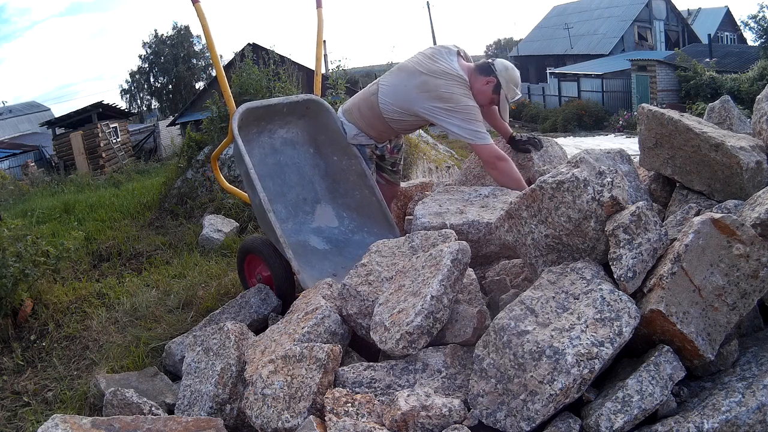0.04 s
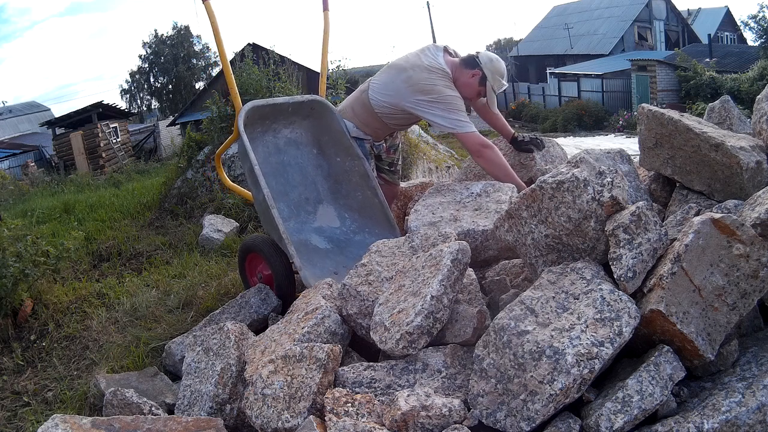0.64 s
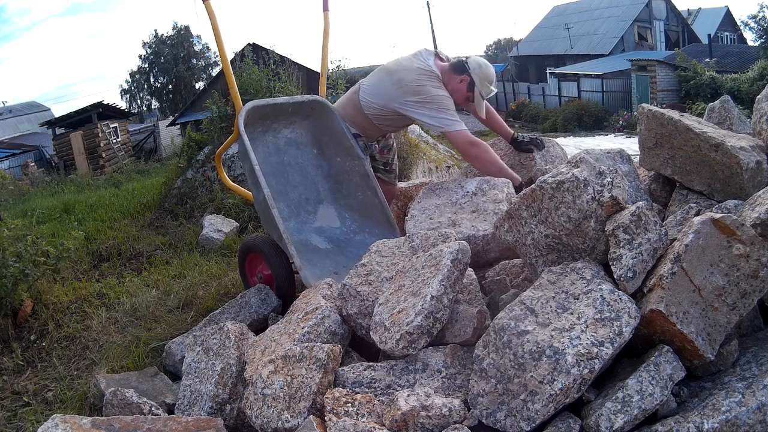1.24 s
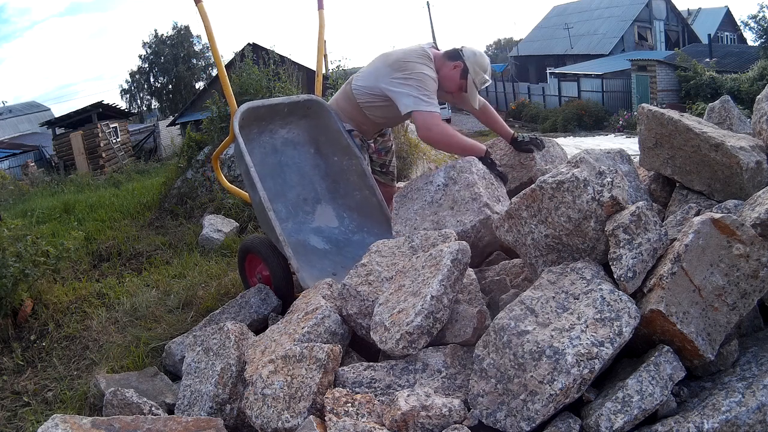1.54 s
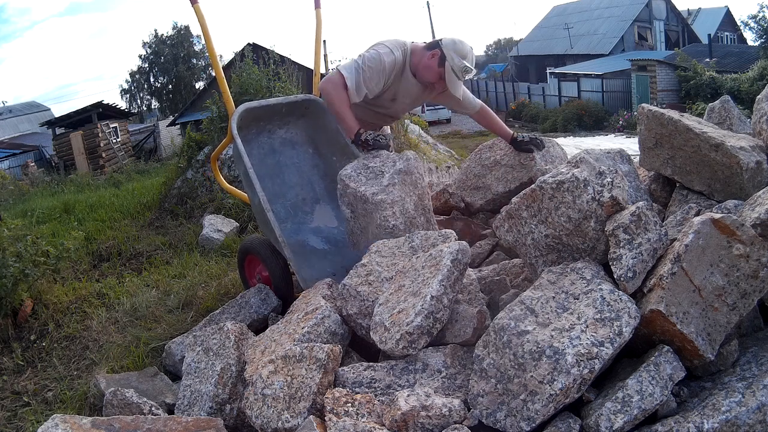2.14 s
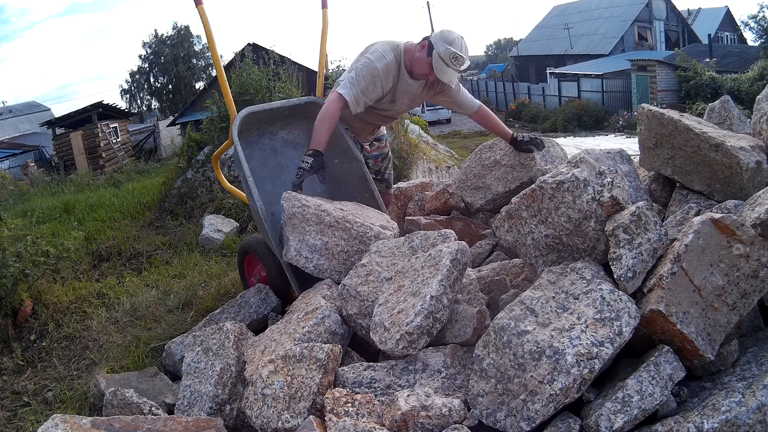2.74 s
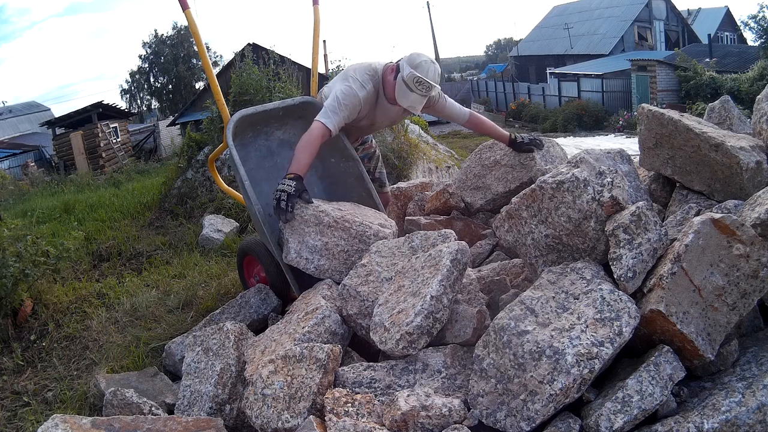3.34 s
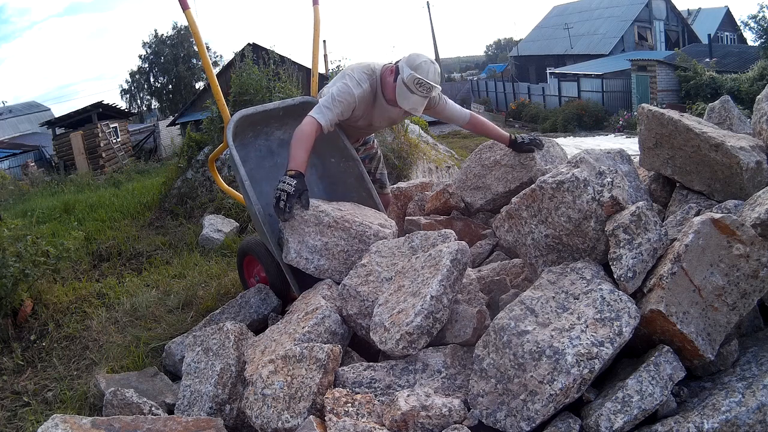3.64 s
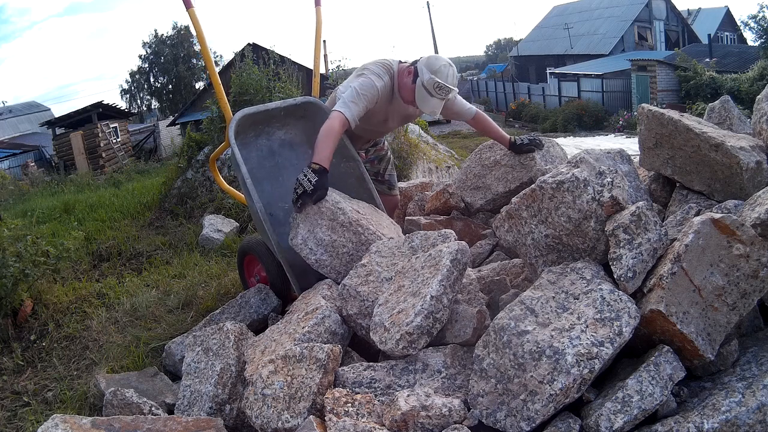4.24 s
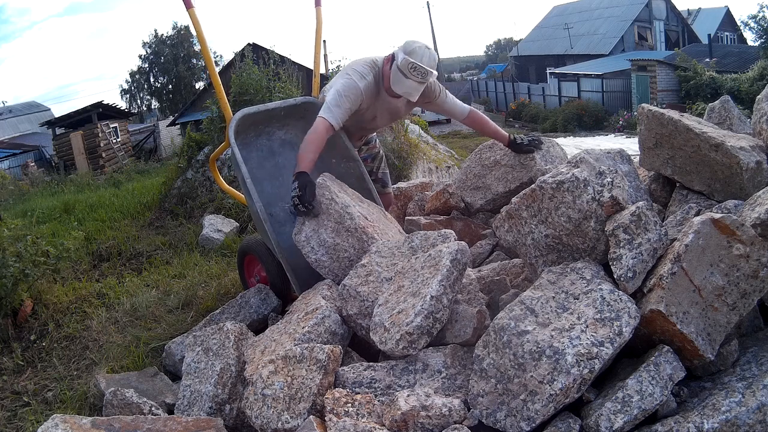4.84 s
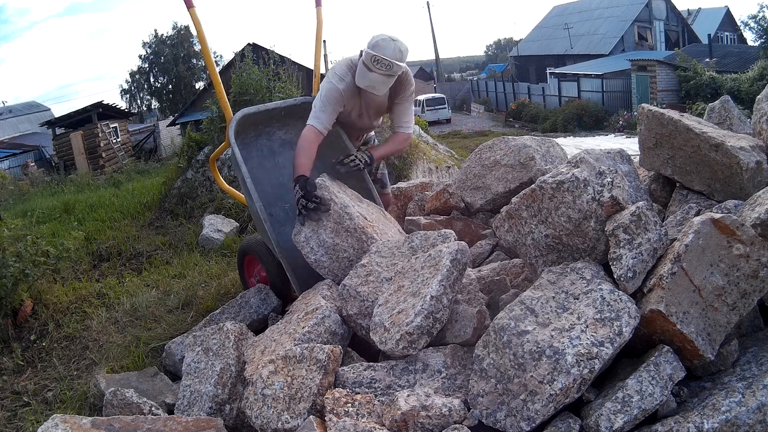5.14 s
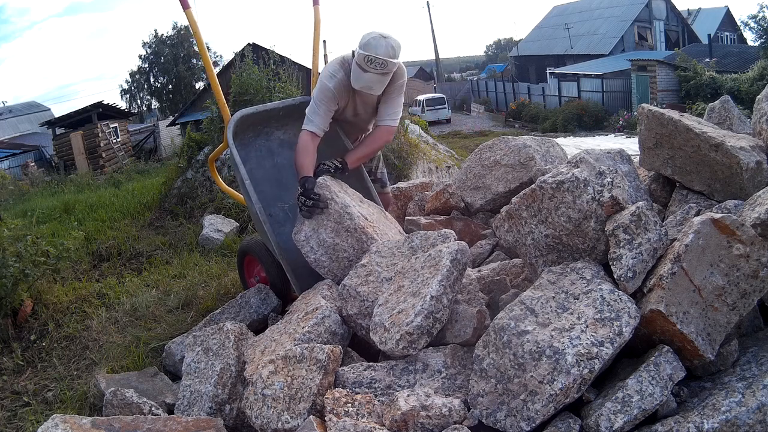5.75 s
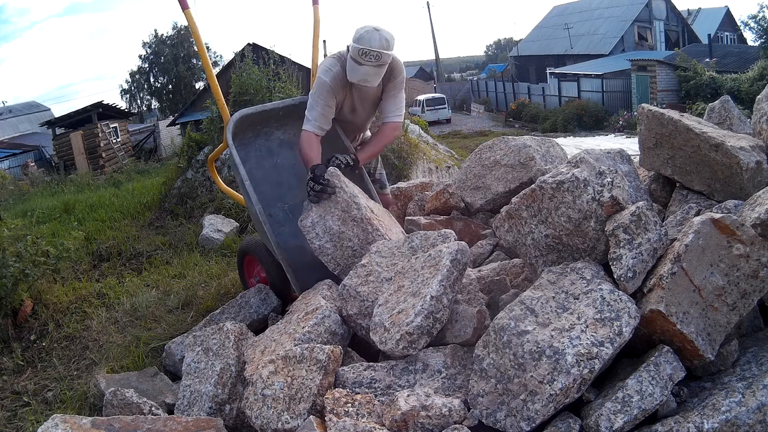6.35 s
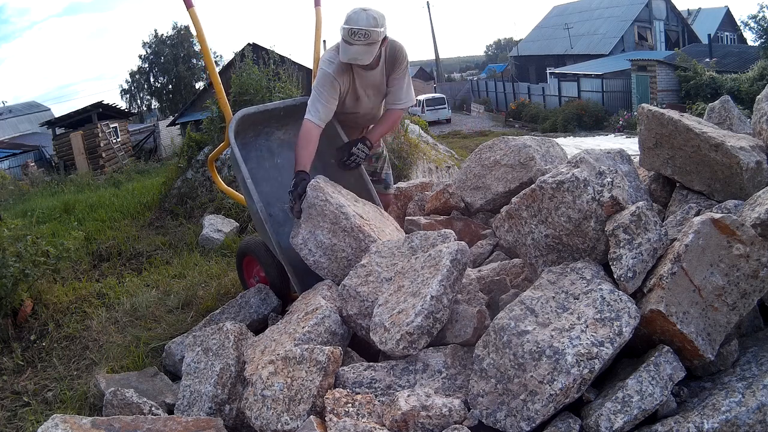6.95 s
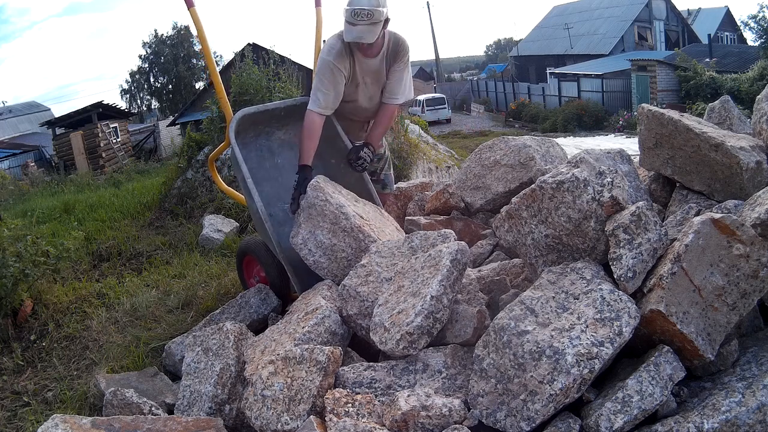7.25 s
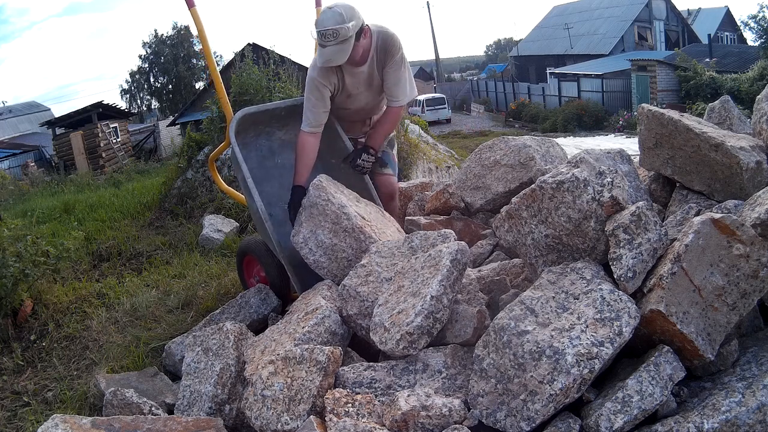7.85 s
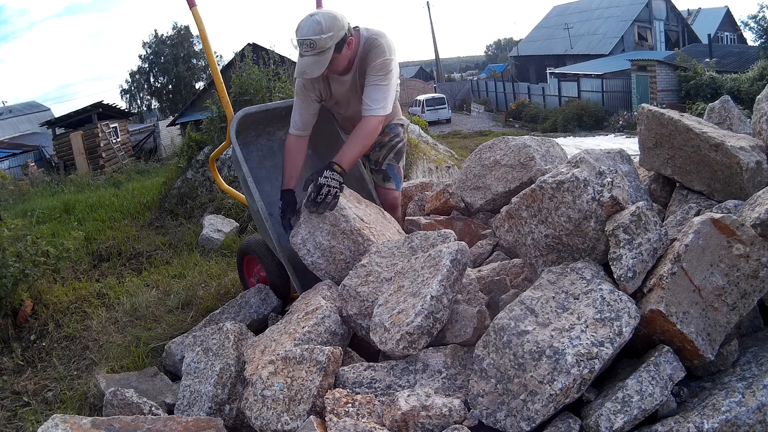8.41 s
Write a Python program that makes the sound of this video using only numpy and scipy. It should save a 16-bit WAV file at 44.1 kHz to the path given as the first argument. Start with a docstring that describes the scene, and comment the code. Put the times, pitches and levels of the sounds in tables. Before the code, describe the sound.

Outdoors, a heavy stone block is dragged off a pile with gritty scrapes, clacks and tiny squeaks. It tumbles into a steel wheelbarrow with two loud blows, and the tray booms briefly under them. Shorter, quieter shoves and dull knocks follow, with pauses, as the block is worked into place. The microphone is a few metres away over faint air, and the heaviest hits overload it slightly.

```python
"""A gritty scrape and a dull knock: a heavy granite block is dragged off a pile, then tumbled into an
upended steel wheelbarrow and shoved into place. Its rough faces stick and slip, knock, squeak and shed
grit, and the steel tray booms under every blow. Outdoors, a few metres away, over faint air: only the
neighbouring stones reflect, and the two heaviest blows overload the microphone."""
import sys
import numpy as np
from scipy import signal
from scipy.fft import rfft, irfft, next_fast_len
from scipy.io import wavfile
from scipy.ndimage import uniform_filter1d

SR = 44100
rng = np.random.default_rng(int(sys.argv[2]) if len(sys.argv) > 2 else 0)


def log_audio(samples):
    """Write samples as a 16-bit WAV file to the path given in sys.argv[1]."""
    # one column per channel
    frames = np.atleast_2d(samples).T
    # limit to full scale, then quantise
    limited = np.clip(frames, -1, 1)
    pcm = np.round(limited * 32767).astype(np.int16)
    wavfile.write(sys.argv[1], SR, pcm)


N = 378378


def undb(db):
    """Decibels to gain."""
    return 10 ** (np.asarray(db) / 20)


def unit(x):
    """Scale to rms 1."""
    return x / np.sqrt(np.mean(x ** 2))


def unit_energy(x):
    """Scale a response so that it passes white noise at the same level."""
    return x / np.sqrt(np.sum(x ** 2))


def add(track, start_s, x):
    """Mix x into the track from start_s on."""
    i = max(int(start_s * SR), 0)
    track[i:i + len(x)] += x[:len(track) - i]


def colour(x, curve, size=4096):
    """Minimum-phase EQ shaped by (freq_hz, gain_db) points, scaled to unit energy."""
    hz, db = np.transpose(curve)
    bin_hz = np.maximum(np.arange(size // 2 + 1) * SR / size, 1)
    gain = undb(np.interp(np.log(bin_hz), np.log(hz), db))
    cepstrum = irfft(np.log(gain))
    cepstrum[1:size // 2] *= 2  # folding the cepstrum makes the filter causal
    cepstrum[size // 2 + 1:] = 0
    response = irfft(np.exp(rfft(cepstrum)))
    return signal.fftconvolve(x, unit_energy(response))[:len(x)]


def band(x, low_hz, high_hz, order=2):
    """Butterworth band-pass."""
    edges_hz = [low_hz, min(high_hz, .45 * SR)]
    return signal.sosfilt(signal.butter(order, edges_hz, "band", fs=SR, output="sos"), x)


def drift(rate_hz):
    """Modulator of rms 1 that glides to a new random value rate_hz times a second."""
    hold = int(SR / rate_hz)
    steps = np.repeat(rng.standard_normal(N // hold + 1), hold)
    return unit(uniform_filter1d(steps, hold)[:N])


def slips(n, per_s, spread_db):
    """Random tiny impacts: many small ones and, as the spread widens, a few large."""
    happens = rng.random(n) < per_s / SR
    polarity = np.sign(rng.standard_normal(n))
    size_db = spread_db * np.minimum(rng.exponential(size=n), np.pi)
    return happens * polarity * undb(size_db)


def stone_reflections(x, decay_s=0.02, scatter_db=-2):
    """Direct sound plus a short spray of reflections from the neighbouring stones."""
    t = np.arange(SR // 30) / SR
    spray = rng.standard_normal(len(t)) * np.exp(-t / decay_s)
    response = undb(scatter_db) * unit_energy(spray)
    response[0] += 1
    return signal.fftconvolve(x, unit_energy(response))[:len(x)]


# Tone of the outdoor bed: freq_hz, gain_db
AIR_EQ = [(10, -2.5), (25, 3), (45, 2), (100, -7), (400, -16.5), (800, -21), (2000, -28.5), (5000, -32.5),
          (12000, -32.5), (16000, -33.5)]


def air(level_db=-60.5):
    """Faint outdoor rumble under an even hiss."""
    return undb(level_db) * unit(colour(rng.standard_normal(N), AIR_EQ))


# Crumbs crushed under an edge: start_s, level_db
GRIT_CUES = [(1.372, -60), (1.794, -58.5), (1.927, -59), (2.010, -51.5), (2.063, -53), (2.202, -42),
             (2.254, -45), (2.303, -49), (2.326, -51), (2.383, -46), (2.627, -45.5), (3.03, -57),
             (3.052, -53.5), (4.1, -61), (4.125, -60), (4.385, -59), (4.54, -56.5), (6.472, -67),
             (6.56, -53.5), (6.6, -61)]
# Their bright crunch: freq_hz, gain_db
GRIT_EQ = [(800, -28.5), (2000, 7.5), (3300, 12), (4600, -3.5), (7200, 1), (9400, -8.5), (11800, 2.5),
           (13000, -6), (13800, -13.5), (16000, -24)]


def grit(swell_s=0.014):
    """Bursts of tiny fractures that swell while a crumb bears the load, then fade as it gives way."""
    age = np.arange(SR // 4) / SR / swell_s
    burst = (age * np.exp(1 - age)) ** 2
    crushing = np.zeros(N)
    for start_s, level_db in GRIT_CUES:
        add(crushing, start_s, undb(level_db) * burst)
    fractures = stone_reflections(slips(N, per_s=2200, spread_db=0))
    return crushing * unit(colour(fractures, GRIT_EQ))


# Hard points singing as they skid, from groan to chirp: start_s, pitch_hz, level_db, length_s
SQUEAK_CUES = [(0.376, 1180, -55.5, 0.046), (0.835, 2730, -64, 0.038), (1.158, 4740, -75.5, 0.33),
               (1.278, 1096, -41, 0.018), (1.374, 1950, -43, 0.0227), (1.507, 3000, -50, 0.041),
               (1.613, 2950, -59, 0.091), (1.952, 3350, -51, 0.045), (2.035, 491, -33.5, 0.072),
               (2.145, 3420, -51, .032), (2.208, 2830, -49, 0.017), (2.553, 2830, -51.5, 0.027),
               (2.581, 2950, -39.5, 0.013), (2.583, 3250, -44, 0.0166), (3.431, 864, -64, 0.027),
               (4.758, 1850, -57.5, 0.049), (6.408, 229.3, -28, 0.044), (6.465, 256, -37, 0.089),
               (6.468, 1430, -48.5, 0.038), (7.994, 993, -48, 0.032)]


def squeaks(width=0.05):
    """Fast stick-slip locks briefly onto a narrow, rough tone."""
    out = np.zeros(N)
    for start_s, pitch_hz, level_db, length_s in SQUEAK_CUES:
        n = int(length_s * SR)
        noise = rng.standard_normal(2 * n)
        tone = band(noise, pitch_hz / (1 + width), pitch_hz * (1 + width))[n:]  # skip the build-up
        add(out, start_s, undb(level_db) * unit(tone * signal.windows.tukey(n, .6)))
    return out


# Panel modes of the steel tray: pitch_hz, gain_db
TRAY_MODES = [(78, -6.5), (112, 5.5), (136, -1), (160, 3), (186, -3.5), (213, 0.5), (248, -4.5), (304, -1),
              (349, -4.5), (431, -8), (479, -2), (528, -1.5), (651, -8.5), (735, -14.5), (795, -11),
              (879, -1.5), (1005, -4), (1170, -7), (1300, -4.5), (1335, -9.5), (1582, -9.5), (1707, -14.5),
              (1885, -13.5), (2077, -14.5), (2322, -16.5), (2670, -22.5)]
# Tone of its wash of weaker modes: freq_hz, gain_db
TRAY_WASH_EQ = [(60, -6.5), (125, 4), (230, 1), (450, 1), (700, -6.5), (1200, 1.5), (3000, -4.5),
                (4500, -20.5)]


def tray(force, wash_db=-2, bass_t60_s=0.77, treble_t60_s=0.4):
    """The tray booms with its panel modes and a dense wash; its load damps the treble fastest."""
    t = np.arange(SR) / SR

    def fade(hz):
        """Decay of a mode at this frequency."""
        t60_s = np.interp(np.log(hz), np.log([150, 2000]), [bass_t60_s, treble_t60_s])
        return undb(-60 * t / t60_s)

    modes = sum(undb(db) * fade(hz) * np.sin(2 * np.pi * (hz * t + rng.random()))
                for hz, db in TRAY_MODES)
    octaves_hz = np.geomspace(80, 2560, 6)
    tails = sum(band(rng.standard_normal(len(t)), hz, 2 * hz, order=3) * fade(hz) for hz in octaves_hz)
    wash = colour(tails, TRAY_WASH_EQ)
    response = unit_energy(modes) + undb(wash_db) * unit_energy(wash)
    return undb(-15) * signal.fftconvolve(force, response)[:N]


# Shoves that slide the block over stone and steel: start_s, length_s, judder_db, rasp_db, swell_db
SHOVE_CUES = [(0.333, 0.068, -57, -69, 9), (0.405, 0.099, -40.5, -52, 3), (0.532, 0.087, -47, -61.5, 5.5),
              (0.67, 0.067, -49.5, -69.5, -8), (0.779, 0.15, -50.5, -60.5, -3),
              (0.942, 0.15, -56.5, -71, 2), (1.104, 0.22, -46.5, -60, 2), (1.277, 0.17, -42.5, -55, 1),
              (1.454, 0.23, -37, -50, 0), (1.775, 0.03, -39.5, -51.5, 2), (1.908, 0.13, -31, -44.5, 13),
              (2.065, .23, -37, -45, -3), (2.308, 0.091, -26.5, -35, 6), (2.405, 0.063, -26, -50, 0),
              (2.538, 0.061, -29, -45, 0), (2.613, 0.043, -30, -37, 3), (2.722, 0.058, -21.5, -28.5, 2),
              (2.785, 0.31, -34, -46.5, -13.5), (3.413, 0.16, -62.5, -79, -4), (3.805, 0.042, -44, -56, -1),
              (4.035, 0.096, -50, -62, 9), (4.147, 0.16, -51.5, -67, 0), (4.311, .1, -35, -51.5, 7),
              (4.471, 0.094, -31.5, -43.5, -4), (4.75, 0.044, -45.5, -58.5, 3.5),
              (4.882, 0.054, -55, -67.5, 3), (5.445, 0.045, -47, -80, 2), (5.53, 0.16, -51, -63.5, -9),
              (5.804, 0.049, -51, -65.5, -3), (6.09, .22, -45, -57, 3), (6.405, 0.054, -34.5, -56.5, 0),
              (6.453, 0.15, -36.5, -50, -0.5), (6.648, .04, -60, -60, -5), (6.857, .13, -60, -73, 8),
              (6.991, 0.037, -44, -62, 4.5), (7.07, 0.2, -57, -68.5, -4.5), (7.77, 0.14, -49, -69.5, 8.5),
              (7.922, 0.098, -42, -55, 3), (8.212, 0.13, -60.5, -77, 5)]


def shoves(attack_s=0.03, release_s=0.028, creep_db=-17.5, creep_s=0.047):
    """Judder and rasp envelopes: the block breaks loose, swells or sags, stops and creeps on faintly."""
    t = np.arange(SR) / SR
    judder, rasp = np.zeros(N), np.zeros(N)
    for start_s, length_s, judder_db, rasp_db, swell_db in SHOVE_CUES:
        since_stop_s = np.maximum(t - length_s, 0)
        attack = np.minimum(t / attack_s, 1)
        swell = undb(swell_db * (np.minimum(t / length_s, 1) - .5))
        release = np.exp(-since_stop_s / release_s)
        creep = undb(creep_db) * np.exp(-since_stop_s / creep_s)
        push = attack * swell * (release + creep)
        add(judder, start_s, undb(judder_db) * push)
        add(rasp, start_s, undb(rasp_db) * push)
    return judder, rasp


def moving_contact(x, depth_db, rate_hz):
    """The point of contact moves, so each third of an octave from 400 Hz to 4 kHz swells and fades."""
    spectrum = rfft(x, next_fast_len(N))
    bin_hz = np.linspace(1, SR / 2, len(spectrum))
    thirds = np.clip(3 * np.log2(bin_hz / 400), 0, 10)
    out = np.zeros(N)
    for centre in range(11):
        window = np.maximum(1 - np.abs(thirds - centre), 0)
        out += irfft(spectrum * window)[:N] * undb(depth_db * drift(rate_hz))
    return out


def steady(x, span_s=0.036):
    """Level out a slip train: the push of the hands sets its power, not the single tooth."""
    power = uniform_filter1d(x ** 2, int(span_s * SR))
    floor = np.mean(x ** 2) * undb(-16.5)
    return x / np.sqrt(power + floor)


# The grind's low judder, mid scrape and high rasp, each: freq_hz, gain_db
JUDDER_EQ = [(40, -32), (75, -10), (130, -3.5), (220, -3), (330, -4.5), (450, 0), (650, -4), (1000, -24),
             (2000, -62.5)]
SCRAPE_EQ = [(200, -32.5), (450, -6), (650, -0.5), (950, -3), (1300, -6), (2000, -23), (4000, -65.5)]
RASP_EQ = [(500, -29), (900, -4), (1300, 11.5), (2000, 0), (2450, -8), (3100, -10), (3700, -17.5),
           (4400, -29.5), (7000, -33.5), (12000, -42), (16000, -50)]


def grinding():
    """Coarse teeth of the stone catch and let go, shaking the block; finer teeth rasp in between."""
    weight, roughness = shoves()
    catch = undb(3.3 * drift(rate_hz=70))
    coarse = stone_reflections(unit(slips(N, per_s=450, spread_db=3.2))) * catch
    fine = stone_reflections(unit(slips(N, per_s=2200, spread_db=2.5))) * catch
    fine = moving_contact(fine, depth_db=4.5, rate_hz=28)
    judder = steady(colour(coarse, JUDDER_EQ)) * weight
    # middling teeth follow both the weight and the roughness
    scrape = steady(colour(coarse + fine, SCRAPE_EQ)) * np.sqrt(weight * roughness) * undb(2.5)
    rasp = steady(colour(.45 * coarse + .42 * fine, RASP_EQ)) * roughness * undb(4.5)
    return judder + scrape + rasp


# Sharp edge of chipping stone: freq_hz, gain_db
CRACK_EQ = [(500, -13.5), (1200, -6), (2000, 4.5), (3100, -4.5), (4200, -16.5), (6000, -28), (12000, -31.5),
            (16000, -46)]


def knock(pitch_hz, chatter_s, first_touch=.5):
    """One push, whose softness sets the pitch, then chatter as the faces seat; chipping adds a crack."""
    t = np.arange(SR // 6) / SR
    seating = np.exp(-(t / (1.37 * chatter_s)) ** 2) + .05 * np.exp(-t / 0.045)
    chatter = unit_energy(slips(len(t), per_s=4000, spread_db=1.5) * seating)
    contact = chatter + first_touch * (t == 0)
    body = band(contact, .45 * pitch_hz, 1.44 * pitch_hz)
    body = unit_energy(band(body, 49, 2.5 * pitch_hz))
    # the weight of the block thumps underneath, the more so in soft blows
    thump = undb(-15) * 400 / pitch_hz * unit_energy(band(contact, 74, 230))
    # hard, brief blows crack most: 6.5 dB more per octave of pitch, 6 dB per halving of the chatter
    crack_db = -22.5 + 6.5 * np.log2(pitch_hz / 500) + 6 * np.log2(.007 / chatter_s)
    crack = undb(crack_db) * unit_energy(colour(chatter, CRACK_EQ))
    # longer chatter holds more energy at the same peak
    return (body + thump + crack) * np.sqrt(SR * (chatter_s + 0.0042)) * 0.39


# Blows of the block: start_s, level_db, pitch_hz, chatter_s, tray_send_db
KNOCK_CUES = [(0.444, -29, 280, 0.021, 2.5), (.905, -38, 555, 0.0071, 6), (1.134, -39, 323, 0.011, 9),
              (1.284, -38.5, 1060, 0.0058, -14), (1.34, -28.5, 720, 0.012, 10),
              (1.3743, -16.5, 870, 0.013, -7), (1.562, -25.5, 1570, 0.0086, -29),
              (1.591, -21.5, 910, 0.01, -14), (1.639, -29.5, 1120, .007, -5), (1.741, -32, 1166, 0.009, -8),
              (1.795, -32.5, 1060, 0.016, -12), (1.865, -29.5, 920, 0.011, -8),
              (1.928, -26.5, 477, 0.0084, -13), (2.019, -13.5, 610, 0.016, -16),
              (2.098, -25.5, 714, 0.026, -12), (2.341, -19, 644, 0.017, 3), (2.4033, 2.5, 496, 0.01, -8.5),
              (2.42, -11, 230, .012, -15), (2.7385, -3.5, 350, 0.0068, -6), (2.747, -8, 565, 0.013, -5),
              (2.78, 5, 700, 0.0052, -7.5), (3.638, -42.5, 268, .006, 1.5), (3.807, -29, 185, 0.015, -4),
              (4.087, -39, 860, 0.0054, -11), (4.318, -29, 490, 0.0096, -3.5),
              (4.362, -33, 516, 0.0056, 4.5), (4.396, -21, 636, 0.0037, -12),
              (4.482, -24.5, 520, 0.011, -8), (4.551, -13, 410, 0.0051, -16.5),
              (5.475, -47.5, 558, .007, -2.5), (5.809, -26, 269, 0.008, -9),
              (5.855, -41.5, 470, 0.0045, -9), (6.096, -36, 510, 0.0085, 1), (6.165, -33, 374, 0.0031, 7),
              (6.407, -22, 290, 0.016, -6), (6.434, -36, 260, 0.0082, -4), (6.5669, -12, 309, 0.0079, -14),
              (7.173, -40.5, 282, .0047, 0.5), (7.304, -39.5, 589, 0.0076, -6),
              (7.941, -31.5, 421, 0.0053, -2), (7.983, -33, 221, .007, -8)]


def knocks():
    """The block's blows as heard through the air, and the share of them that drives the tray."""
    direct, tray_send = np.zeros(N), np.zeros(N)
    for start_s, level_db, pitch_hz, chatter_s, tray_send_db in KNOCK_CUES:
        blow = undb(level_db) * knock(pitch_hz, chatter_s)
        add(direct, start_s, blow)
        add(tray_send, start_s, undb(tray_send_db) * blow)
    return direct, tray_send


def scene():
    """Mono mix: stone heard directly and through the ringing tray, over the outdoor bed."""
    grind = grinding()
    blows, tray_send = knocks()
    boom = tray(tray_send + undb(-9) * grind)
    return (grind + blows + boom + squeaks() + grit() + air())[None]


def record(dry, ceiling=0.59, top_hz=15750):
    """The microphone clips the heaviest peaks; a steep low-pass trims the top."""
    clipped = dry / (1 + (dry / ceiling) ** 14) ** (1 / 14)
    return signal.sosfilt(signal.ellip(8, .2, 70, top_hz, fs=SR, output="sos"), clipped)


dry = scene()
out = record(dry)
log_audio(out)
```